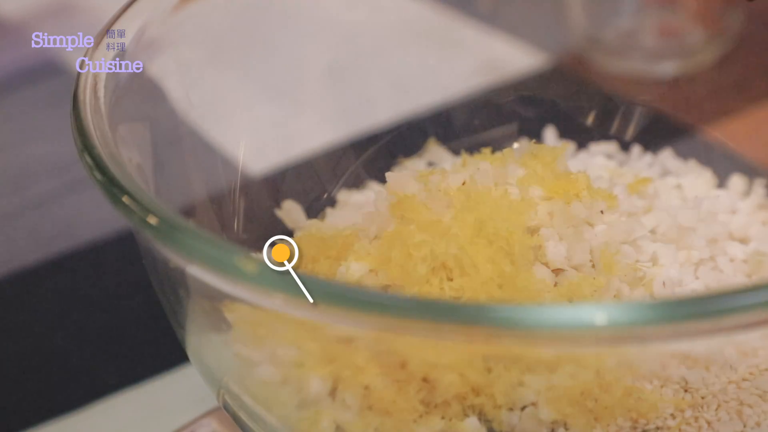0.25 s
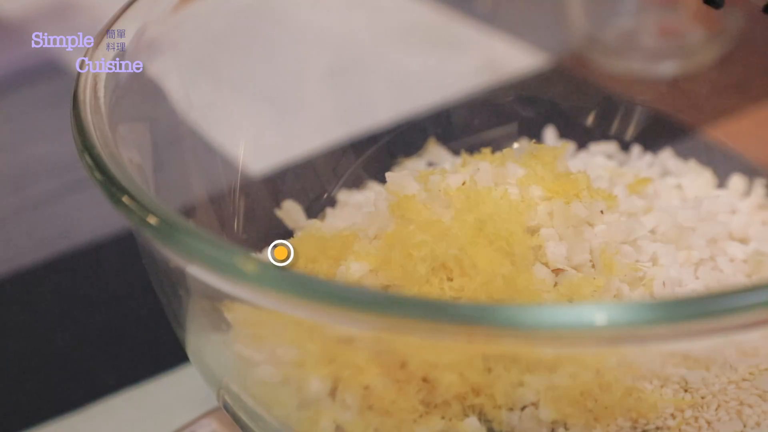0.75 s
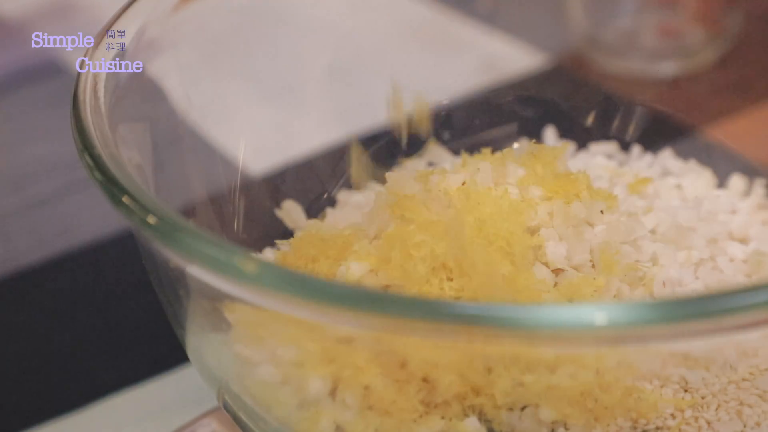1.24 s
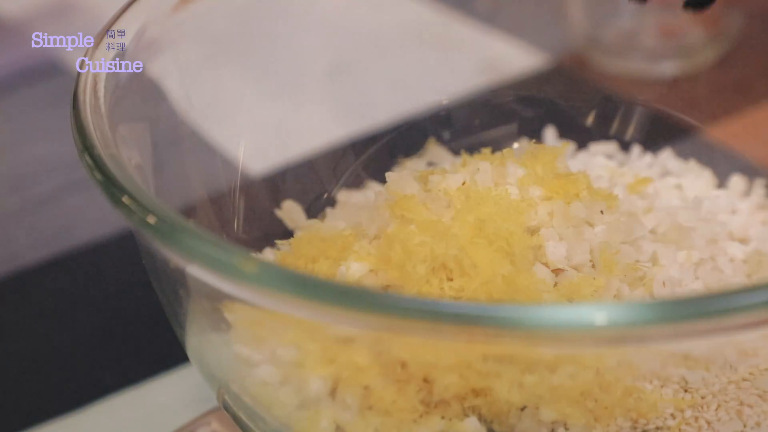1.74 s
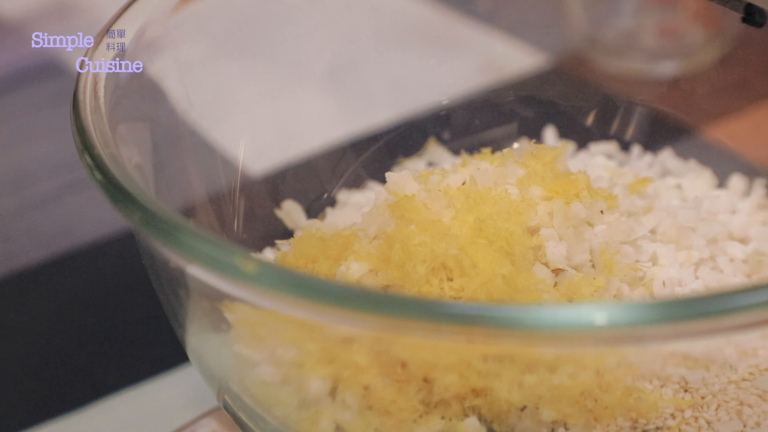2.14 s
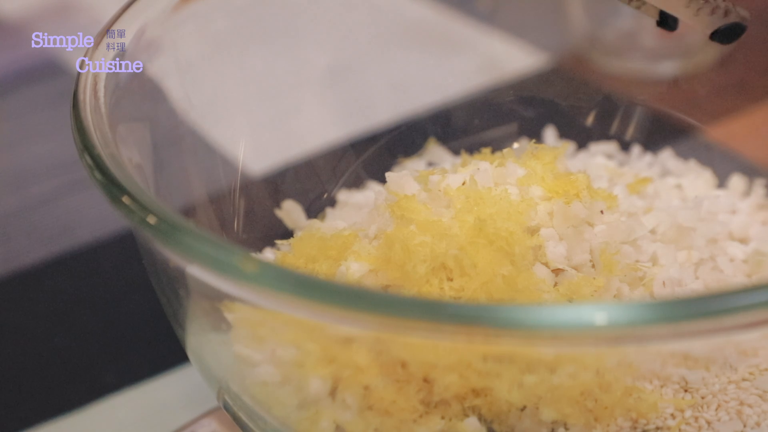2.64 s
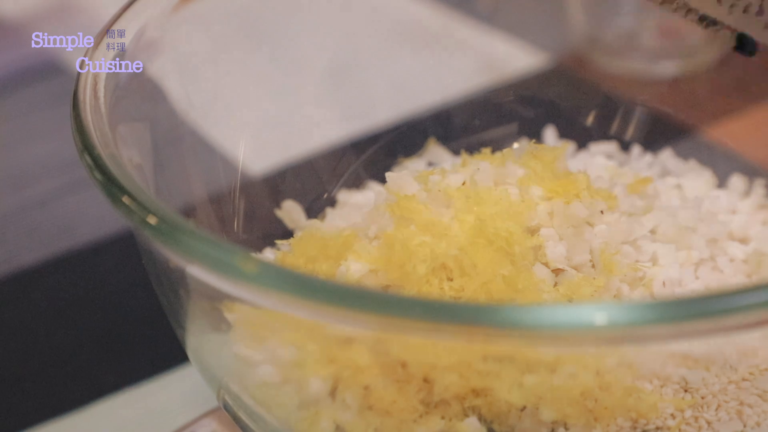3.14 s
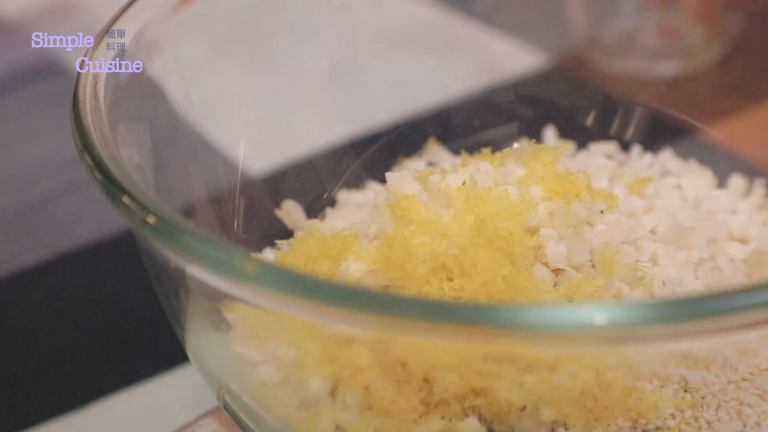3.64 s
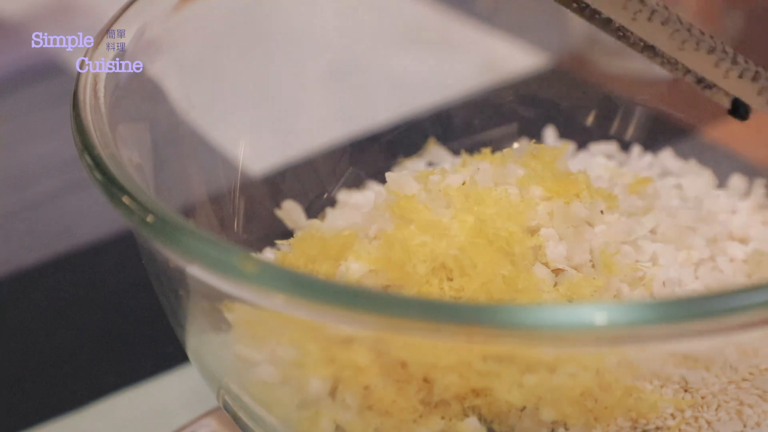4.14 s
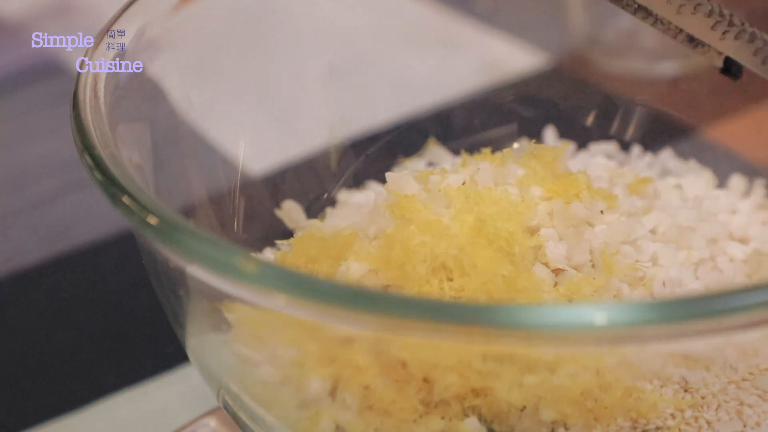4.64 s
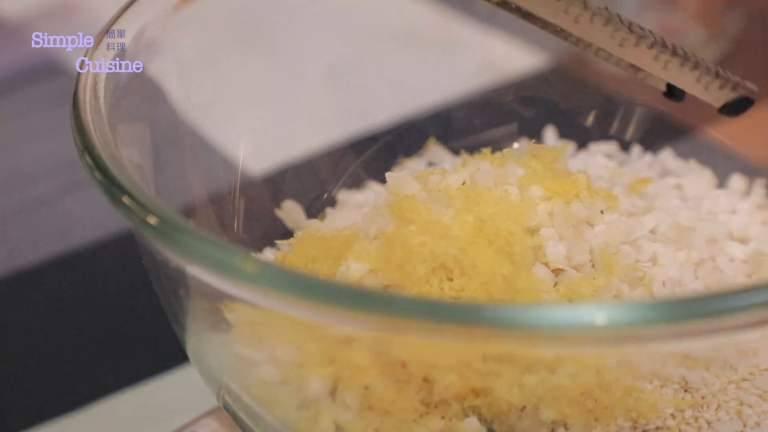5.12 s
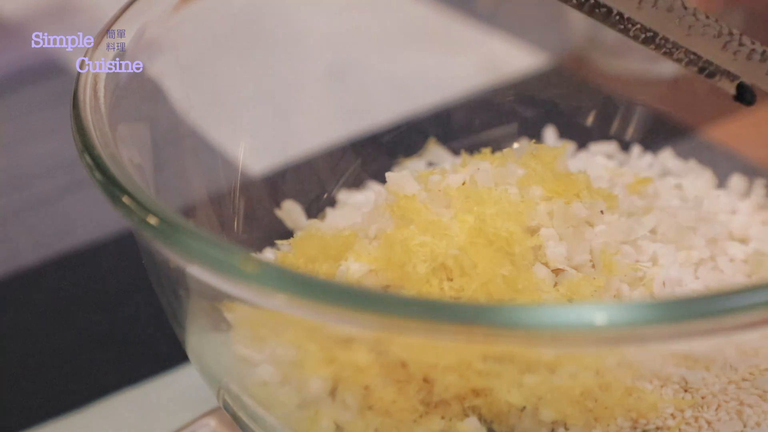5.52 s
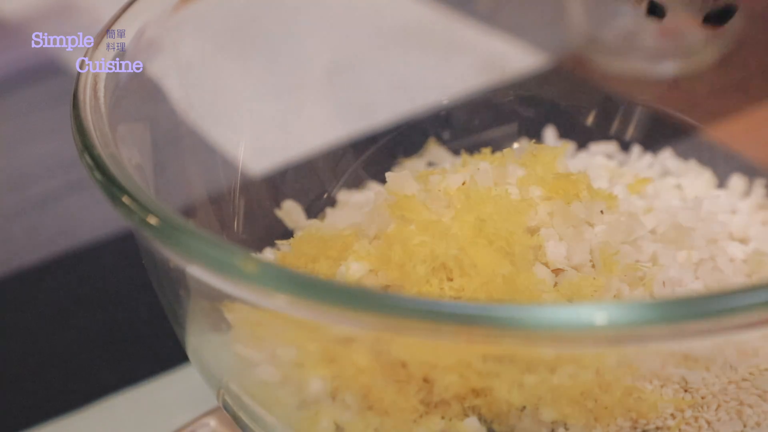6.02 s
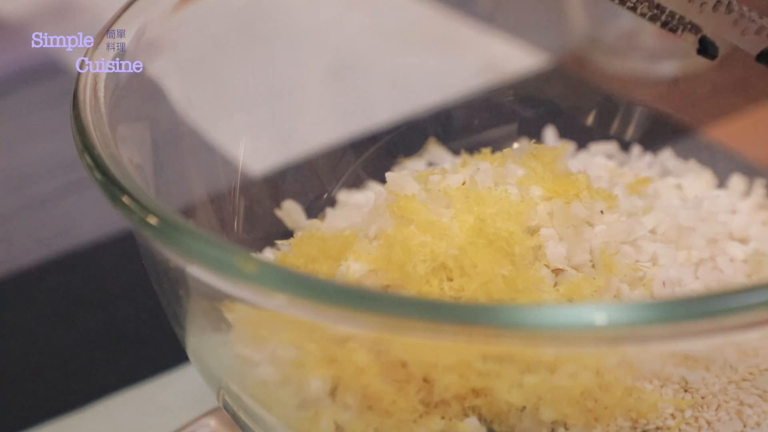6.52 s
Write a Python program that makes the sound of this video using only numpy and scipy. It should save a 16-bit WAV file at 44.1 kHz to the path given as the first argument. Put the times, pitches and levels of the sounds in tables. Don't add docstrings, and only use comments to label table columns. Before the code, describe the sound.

Very close microphone in a quiet kitchen: citrus peel is rasped on a thin steel grater in five fast back-and-forth strokes, loud pushes and softer brighter pulls. A hard knock and slow, uneven drag follow. Then mostly quiet dry rustling and sticky ticks, a ringing knock, scattered jabs, a long rough drag, a soft thud and last short scrapes over low appliance rumble and hiss.

```python
import sys
import numpy as np
from scipy import signal
from scipy.fft import rfft, irfft, next_fast_len
from scipy.io import wavfile
from scipy.ndimage import uniform_filter1d

SR = 44100
rng = np.random.default_rng(int(sys.argv[2]) if len(sys.argv) > 2 else 0)


def file_out(sig):
    cols = np.atleast_2d(sig).T
    lim = np.clip(cols, -1, 1)
    pcm = np.round(lim * 32767).astype(np.int16)
    wavfile.write(sys.argv[1], SR, pcm)


def volts_from_decibels(level):
    exponent = np.asarray(level, float) / 20
    return 10 ** exponent


N = 298537

# frequency_hz, level_db_per_hz
BLADE_BODY = [(180, -59), (300, -44.5), (591, -28), (864, -33.5), (1120, -26), (1390, -15), (1790, -9),
              (1970, -6), (2490, -9), (2930, -5), (5140, -13.5), (7280, -5), (9640, -10), (10800, -11.5),
              (15600, -31)]
TOP_PER_BITE = 1.4
DULL_TEETH, DULL_TOP = .18, .36


def grater():
    # centre_hz, width_hz, level_db
    body_modes = [(1920, 140, -1.5), (2009, 85, 4), (2090, 60, 4.5), (2707, 220, -1), (2944, 50, 4.5),
                  (3118, 130, -2), (3481, 39, 2), (3690, 81, -3.5), (4040, 35, -17.5), (5880, 99.3, -15.5),
                  (5670, 108.3, -20.5), (7115, 200, -1.5), (7665, 190, 1), (8530, 200, 1),
                  (10700, 370, -6.5), (11400, 60, -8.5)]
    group_edges_hz = [0, 3300, 5500, 9800, 30000]
    # time_s, level_db
    low_mode_points = [(0, -1.5), (.2, -3), (.3, -.5), (.42, .5), (.48, -3), (.57, 1.2), (.67, -3.5), (.72, .8),
                       (.94, 1.5), (1.03, -3), (1.17, -1.2), (1.66, 1.5), (1.75, -1.5), (3.9, .5), (5.7, -1.5),
                       (5.85, 1.8), (6.77, 1.2)]
    low_modes_below_hz = 2400

    pressure, *over = hand()
    share = np.array([np.ones(N)] + over)
    share /= np.sqrt(np.sum(share ** 2, axis=0))
    pressure = pressure * volts_from_decibels(-3.5 + 0.57 * walk(120))
    teeth_lead = np.clip(share[2] / share[0] / 3.5, .2, .9)
    bursts = grit(600, 3.5, 0) * teeth_lead
    out = 0
    for k, (low_hz, high_hz) in enumerate(zip(group_edges_hz, group_edges_hz[1:])):
        catches = grit(9000, 2.2, .8) + (k >= 2) * bursts
        force = band(catches, low_hz, high_hz)
        loudness = np.std(colour(force, BLADE_BODY, body_modes, mode_db=-3.5))
        if k == 0:
            low_mode_gain = volts_from_decibels(np.interp(np.arange(N) / SR, *np.transpose(low_mode_points)))
            force = force + (low_mode_gain - 1) * band(force, 0, low_modes_below_hz)
        force = force * share[k] * pressure * volts_from_decibels(1.3 * walk(70))
        out = out + colour(force, BLADE_BODY, body_modes, mode_db=-3.5) / loudness
    return out


def hand():
    # full_contact_s, length_s, level_at_contact_db, change_to_end_db, bite_db hard strokes away
    pushes = [
        (.133, .084, -8, -5.5, 3),
        (.407, .085, -8.5, -.5, 2.2),
        (.659, .067, -6, -2, -.3),
        (.891, .055, -6.5, -1.5, -2.2),
        (1.125, .08, -4, -12, 1.5),
    ]
    pulls = [
        (.024, .056, -23, -1.5, 8),
        (.272, .101, -24, 2.5, 2.2),
        (.548, .064, -16, 1.2, 7),
        (.79, .052, -17.5, -3, 8.5),
        (1.018, .055, -21, 9.5, 8),
    ]
    jabs = [(3.885, .018, -16.5, -6, -1.5), (3.978, .021, -13.5, 2.5, 5.5), (4.494, .077, -21, 12, 3),
            (4.726, .058, -17.5, 2.2, 1.5), (5.079, .028, -21, -8, 6), (5.645, .014, -11, -1.5, 2.2),
            (5.687, .021, -17, .3, -.8), (6.043, .012, -29, .3, -5), (6.367, .022, -24.5, .8, -5.5),
            (6.512, .009, -17.5, -.3, -5), (6.544, .021, -5.5, -4, 1.2), (6.594, .008, -16.5, -.3, -4),
            (6.742, .011, -11, -3, -3.5), (6.76, .003, -22, -.3, -3)]
    grazes = [(2.742, .012, -41.5, -1.5, -3), (3.46, .012, -46, -1.5, -3), (3.88, .003, -36, .3, 1.5),
              (3.92, .004, -32, -.3, -1.5), (5.07, .003, -30, .3, 1.5), (5.331, .027, -28, -1.5, 5.5),
              (5.636, .003, -32, .3, 1.5)]
    # landing_db_per_s, arch_db_per_s_of_length, liftoff_db_per_s, trailing_contact_db, trailing_fade_db_per_s
    shapes = [
        (1500, 55, 800, -16, 410),
        (430, 105, 1600, -24, 700),
        (2000, 45, 1500, -15, 340),
        (330, 30, 900, -15, 300),
    ]
    # upper_modes_start_db, upper_modes_end_db, end_rise_db_per_db_bite,
    # bite_gained_db, top_hiss_db
    tracks = [
        (-4, -2.2, 1.5, .3, -4),
        (-4.5, -2.5, .2, 5, -9),
        (-3.5, .3, .2, 1.5, -3.5),
        (-5, -3, .2, .3, -3),
    ]
    # time_s, level_db, upper_modes_db, bite_db
    drags = [
        [(1.49, -46, -10, -6), (1.51, -25, -10, -6), (1.553, -10, -5, .3), (1.62, -11.5, .3, 2),
         (1.631, -19, .3, .3)],
        [(1.631, -19, .3, .3), (1.648, -11.5, .3, -2), (1.686, -10.5, 1.2, -3), (1.722, -4, 6.5, 4),
         (1.755, -13, 7, 7), (1.779, -31.5, 2, -2), (1.83, -52, 2, -2)],
        [(5.754, -40, 4, 7), (5.767, -5, 4, 7), (5.795, -7, .3, 6), (5.811, -2, -1.2, 5.5),
         (5.832, -8, -1.5, 4), (5.884, -6, 2.5, 2.2), (5.93, -8, -.3, 5), (5.978, -12, 4, .3),
         (6.04, -36, .3, -3)],
    ]

    t = np.arange(0, N / SR + .002, .001)
    moves = []
    for rows, shape, track in zip((pushes, pulls, jabs, grazes), shapes, tracks):
        for row in rows:
            moves.append(stroke(t, row, shape, track))
    moves = np.array(moves + [drag(t, table) for table in drags])
    strongest = moves[:, 0].argmax(axis=0)
    lead = moves[strongest, :, np.arange(len(t))].T
    lead[1:] = uniform_filter1d(lead[1:], size=9, axis=1)
    return [volts_from_decibels(np.interp(np.arange(N) / SR, t, db)) for db in lead]


def stroke(t, row, shape, track):
    catch_db, catch_db_per_s = 5, 1500
    s, length, db, change_db, bite_db = row
    land, arch, lift, trail_db, fade = shape
    from_db, to_db, rise, gained_db, top_db = track
    way = np.clip((t - s) / length, 0, 1)
    after = np.maximum(t - s - length, 0)
    before = np.maximum(s - t, 0)
    landing_loss = land * before + np.minimum(catch_db_per_s * before, catch_db)
    lost = landing_loss + np.minimum(lift * after, fade * after - trail_db)
    pressure = db + change_db * way + 4 * arch * length * way * (1 - way) - lost
    slack = np.minimum(lost, 25)
    bite = bite_db + gained_db * (way - .5)
    upper = from_db + (to_db + rise * bite_db - from_db) * way
    top = TOP_PER_BITE * bite + top_db - DULL_TOP * slack
    return pressure, upper, bite - DULL_TEETH * slack, top


def drag(t, table):
    drag_top_db = -4.5
    s, db, upper_db, bite_db = np.transpose(table)
    pressure = np.interp(t, s, db, left=-200, right=-200)
    slack = np.minimum(db.max() - pressure, 25)
    bite = np.interp(t, s, bite_db)
    top = bite + drag_top_db - (DULL_TOP - DULL_TEETH) * slack
    return pressure, np.interp(t, s, upper_db), bite, top


def taps():
    # start_s, peak_db, tail_db, tail_t60_s, thud_db
    knocks = [
        (1.439, -4.5, -17.5, 0.097, -24),
        (2.337, -11.5, -9.5, 0.122, -25),
        (6.264, -22.5, -27, 0.044, -11),
    ]
    # frequency_hz, level_db_per_hz
    knock_colours = [
        [(35, -42), (60, -25.5), (559, -14.5), (1180, -16.5), (2210, -2.5), (3350, -6.5), (3680, -10.5),
         (5220, -22), (5590, -19), (8110, -23), (15600, -41.5)],
        [(88, -27), (150, -15.5), (782, -17.5), (1950, 0), (2230, -14.5), (3160, -4), (4320, -21), (7440, -19),
         (9390, -23), (10600, -14), (15600, -45.5)],
        [(35, -31), (60, -1), (413, -1), (1150, -14.5), (3200, -1), (5100, -17.5), (7570, -10.5),
         (10700, -11.5), (15600, -35)],
    ]
    contact_s = .0041

    out = np.zeros(N)
    t = np.arange(int(.12 * SR)) / SR
    for (s, db, tail_db, t60, thud_db), shade in zip(knocks, knock_colours):
        contact = rng.standard_normal(len(t)) * np.exp(-(t / contact_s) ** 3)
        contact[0] = -5
        hit = colour(contact, shade)
        decay = np.exp(-np.log(1000) * t / t60)
        ring = colour(rng.standard_normal(len(t)) * decay, shade, [(2000, 410, 3)])
        thud = np.sin(2 * np.pi * 155 * t) * np.exp(-(t / .008) ** 2)
        thud += .9 * np.sin(2 * np.pi * 540 * t) * np.exp(-t / .004)
        knock = hit / np.abs(hit).max() + volts_from_decibels(tail_db) * ring / np.abs(ring).max() + volts_from_decibels(thud_db) * thud
        i = int((s + .0014) * SR)
        out[i:i + len(t)] += knock * volts_from_decibels(db)
    return out


def handling():
    # frequency_hz, level_db_per_hz
    rustle_colour = [(2940, -39), (5000, -6.5), (5580, -12.5), (7560, 2.5), (8590, 2.5), (11300, -5),
                     (13500, -2), (15600, -15.5)]
    # start_s, peak_db, centre_hz
    peel_ticks = [(1.8645, -35.5, 8660), (1.9155, -36.5, 9000), (1.9699, -37.5, 8760),
                  (2.0238, -34.5, 8790), (2.3734, -35, 8940), (2.607, -39.5, 4700), (2.6314, -36.5, 8370),
                  (3.2415, -32.5, 8400), (3.5229, -33, 9550), (3.5982, -33.5, 8440), (4.2777, -30, 8570),
                  (4.376, -35, 12200), (4.3994, -36.5, 8760), (4.4248, -41, 8090), (4.9896, -32, 8300),
                  (5.23, -40.5, 9420), (5.2844, -33.5, 10120)]
    blade_db = -9

    high = fingers()
    low = high * volts_from_decibels(blade_db)
    patchy = volts_from_decibels(1.8 * walk(45))
    out = high * unit(colour(grit(3000, 2.8, 1.1) * patchy, rustle_colour))
    out += low * unit(band(colour(grit(3000, 2.8, 1.1) * patchy, BLADE_BODY), 0, 5000))
    t = np.arange(int(.012 * SR)) / SR
    for s, db, hz in peel_ticks:
        burst = rng.standard_normal(len(t)) * np.exp(-t / 0.002)
        tick = colour(burst, [(1500, -40), (3000, -13), (14000, -10.5), (16000, -27.5)], [(hz, 3000, 0)])
        i = int(s * SR)
        out[i:i + len(t)] += tick / np.abs(tick).max() * volts_from_decibels(db - 0.5)
    return out


def fingers():
    # peak_s, rustle_db, swell_s_per_15_db, fade_s_per_15_db
    shifts = [(1.377, -53, .1, .04), (1.946, -50.5, .18, .035), (2.042, -46.5, .045, .075),
              (2.134, -50, .03, .04), (2.18, -49, .016, .012), (2.39, -55, .03, .055),
              (2.494, -50, .045, .05), (2.658, -48, .04, .1), (2.748, -46, .1, .09), (3.015, -46, .27, .15),
              (3.133, -45.5, .11, .032), (3.243, -51, .05, .2), (3.465, -52, .05, .025),
              (3.528, -49.5, .03, .06), (3.599, -51, .05, .2), (3.769, -48, .11, .2),
              (3.869, -42, .26, .25), (4.1, -56, .06, .2), (4.279, -45.5, .19, .055),
              (4.376, -51.5, .018, .07), (4.475, -45, .07, .03), (4.87, -55.5, .05, .25),
              (5.04, -44, .14, .06), (5.192, -56.5, .15, .08), (5.29, -52, .035, .05), (5.41, -51, .05, .5),
              (5.619, -47, .15, .03), (6.09, -48, .06, .2), (6.489, -54.5, .12, .02)]
    t = np.arange(0, N / SR + .002, .001)
    levels = [db - 15 * np.maximum((s - t) / swell, (t - s) / fade) for s, db, swell, fade in shifts]
    return volts_from_decibels(np.interp(np.arange(N) / SR, t, np.max(levels, axis=0)))


def kitchen():
    # frequency_hz, level_db_per_hz
    floor_colour = [(12, -36), (20, -0.5), (141, -1.5), (298, -8.5), (960, -12), (1070, -16.5),
                    (1300, -13.5), (1630, -18.5), (2040, -14.5), (3270, -24), (5550, -18.5), (8430, -14.5),
                    (12500, -18), (15600, -22)]
    # time_s, level_db
    rumble_points = [(0.0, -52.5), (1.24, -50.5), (1.41, -52.5), (2.43, -51.5), (4.58, -56), (5.82, -52),
                     (6.39, -58.5), (6.77, -56.5)]
    # time_s, level_db
    hush_points = [
        (6.262, 0),
        (6.285, -5),
        (6.335, -5),
        (6.37, -.5),
    ]
    hiss_db = -56

    hum_modes = [(150, 12, 6), (100, 23, -3.5), (248, 14, -6.5)]  # centre_hz, width_hz, level_db
    floor = colour(rng.standard_normal(N), floor_colour, hum_modes, mode_db=2)
    t = np.arange(N) / SR
    swell = volts_from_decibels(np.interp(t, *np.transpose(rumble_points)) + 2.0)
    rumble = band(floor, 30, 300, soft=.25) * volts_from_decibels(1.5 * walk(9))
    murmur = band(floor, 300, 1200, soft=.25) * volts_from_decibels(1.5 * walk(9))
    hiss = unit(band(floor, 1200, 30000, soft=.25))
    hush_db = np.interp(t, *np.transpose(hush_points))
    return unit(rumble + murmur) * swell + hiss * volts_from_decibels(hiss_db + hush_db)


def unit(x):
    return x / np.sqrt(np.mean(x ** 2))


def colour(x, spectrum, modes=(), mode_db=0):
    hz = np.fft.rfftfreq(8192, 1 / SR) + 1
    f, db = np.transpose(spectrum)
    power = volts_from_decibels(np.interp(np.log(hz), np.log(f), db)) ** 2
    for centre, width, top_db in modes:
        power = power + volts_from_decibels(top_db + mode_db) ** 2 / (1 + (2 * (hz - centre) / width) ** 2) ** 2
    cepstrum = irfft(np.log(power) / 2)
    cepstrum[1:4096] *= 2
    cepstrum[4097:] = 0
    response = irfft(np.exp(rfft(cepstrum)))
    return signal.fftconvolve(x, response)[:len(x)]


def band(x, low_hz, high_hz, soft=0.05):
    size = next_fast_len(len(x))
    hz = np.fft.rfftfreq(size, 1 / SR) + 1

    def edge(at_hz):
        return .5 + .5 * np.tanh(np.log(hz / (at_hz + 1)) / soft)

    gain = np.sqrt(edge(low_hz) * (1 - edge(high_hz)))
    return irfft(rfft(x, size) * gain, size)[:len(x)]


def grit(rate_hz, scatter_db, smooth):
    sizes = volts_from_decibels(scatter_db * np.minimum(rng.exponential(size=N), 4.5))
    catches = (rng.random(N) < rate_hz / SR) * sizes * rng.choice([-1, 1], N)
    return unit(catches) + smooth * rng.standard_normal(N)


def walk(rate_hz):
    k = int(SR / rate_hz)
    held = np.repeat(rng.standard_normal(N)[:N // k + 1], k)[:N]
    return unit(uniform_filter1d(uniform_filter1d(held, k), k))


def scene():
    room_t60_s, room_db = 0.15, -27.5
    near = grater() + taps() + handling()
    t = np.arange(int(.3 * SR)) / SR
    tail = rng.standard_normal(len(t)) * np.exp(-np.log(1000) * t / room_t60_s) * (t > .004)
    tail = colour(tail, [(500, 2.5), (3500, -3), (9000, -9.5), (16000, -13.5)])
    wet = signal.fftconvolve(near, tail / np.sqrt(np.sum(tail ** 2)))[:N]
    return (near + volts_from_decibels(room_db) * wet + kitchen())[None]


def low_pass(x):
    return signal.sosfilt(signal.butter(12, 15710, fs=SR, output="sos"), x)


def record(dry):
    mix = np.clip(dry, -.97, .97)
    return low_pass(mix)


dry = scene()
out = record(dry)
file_out(out)
```